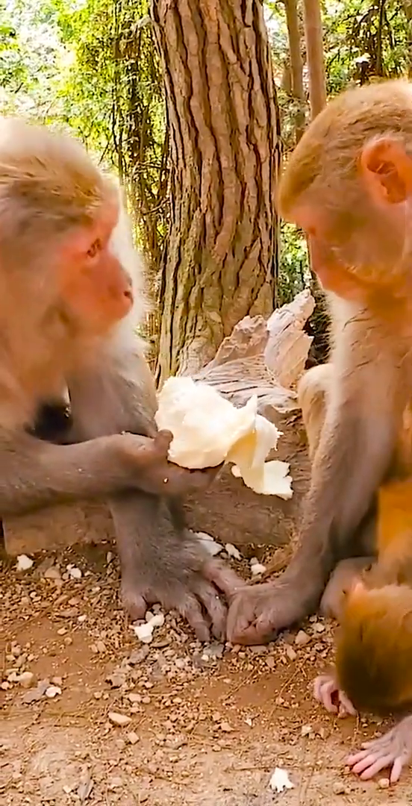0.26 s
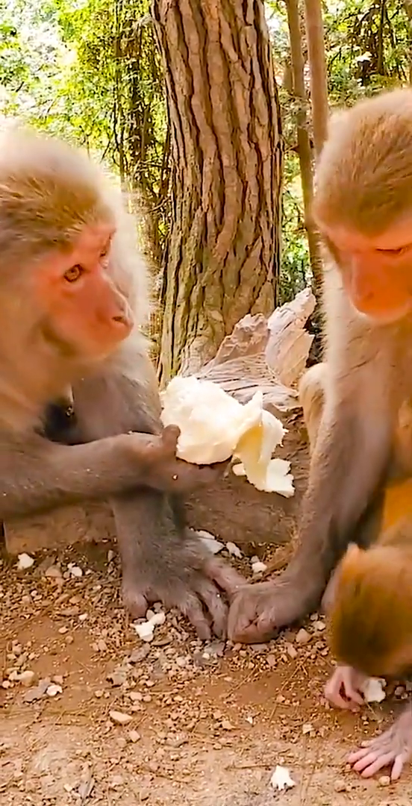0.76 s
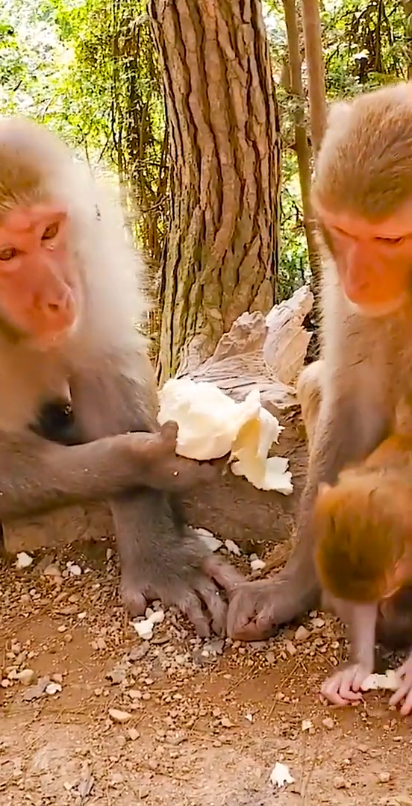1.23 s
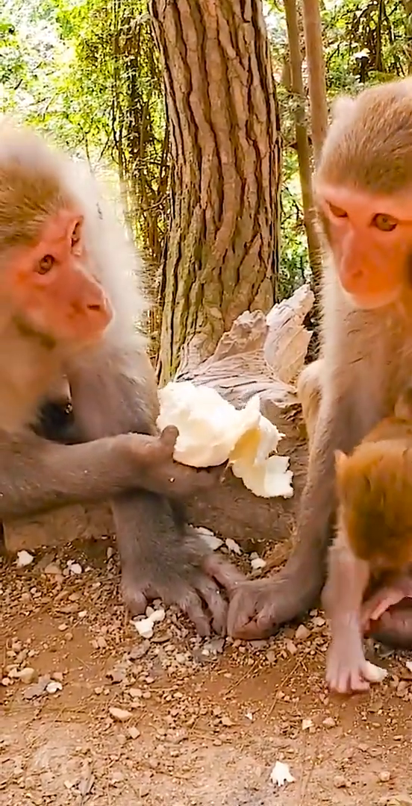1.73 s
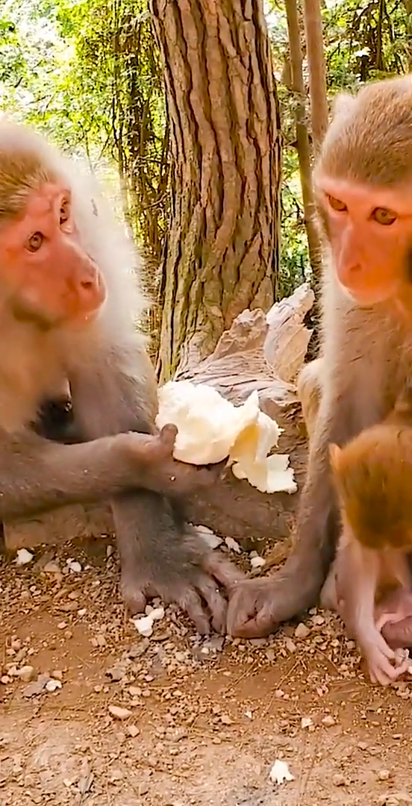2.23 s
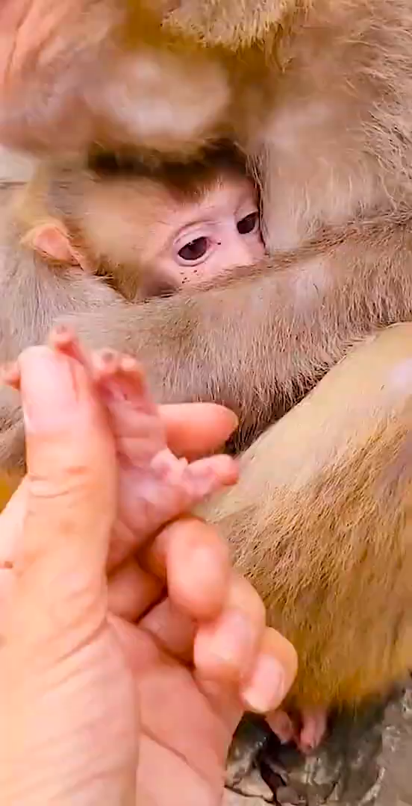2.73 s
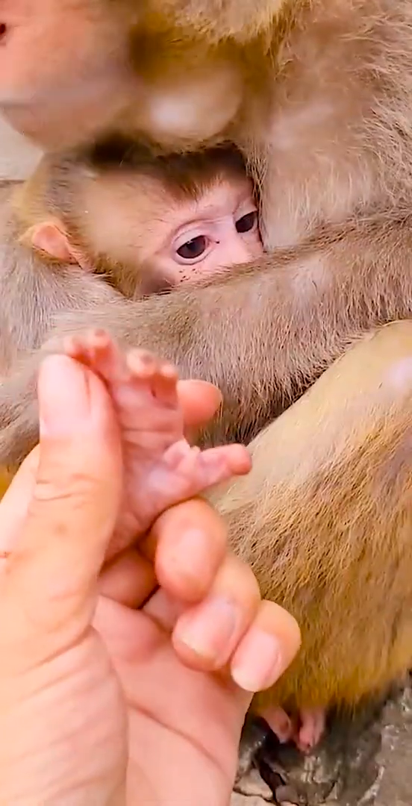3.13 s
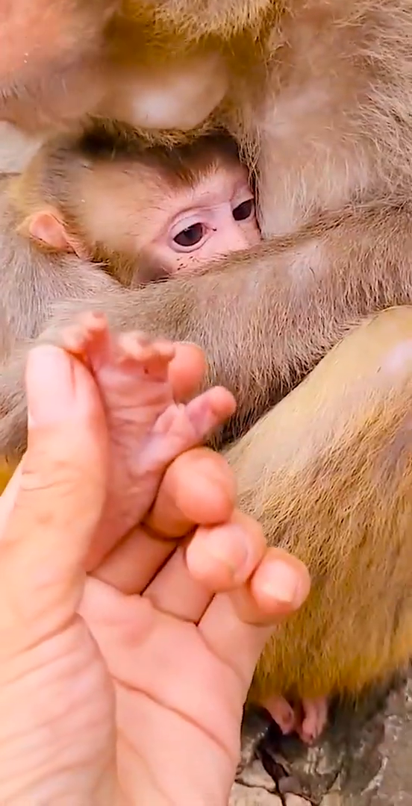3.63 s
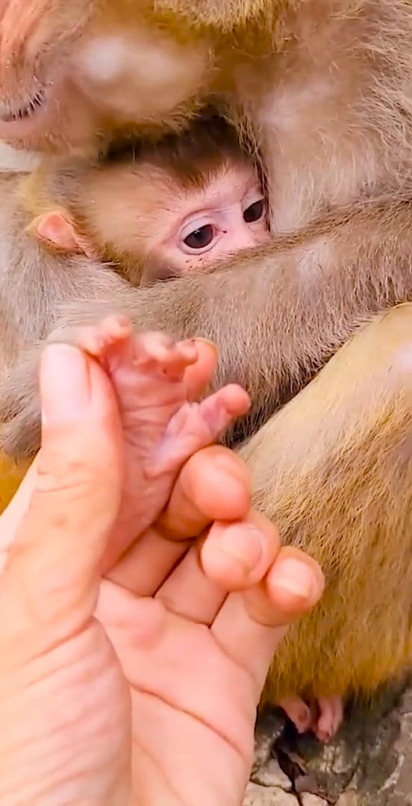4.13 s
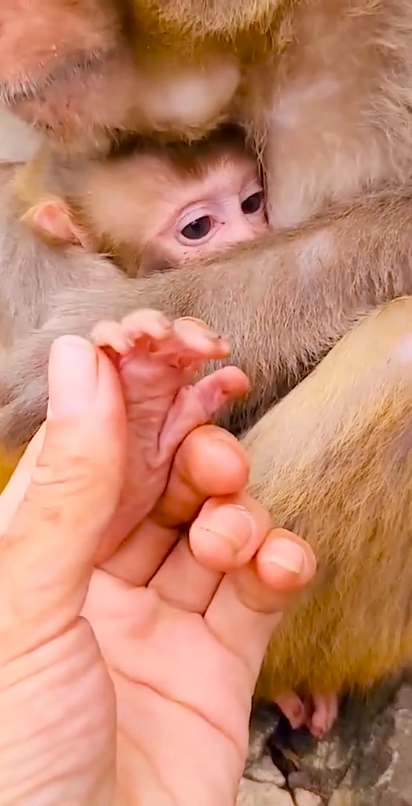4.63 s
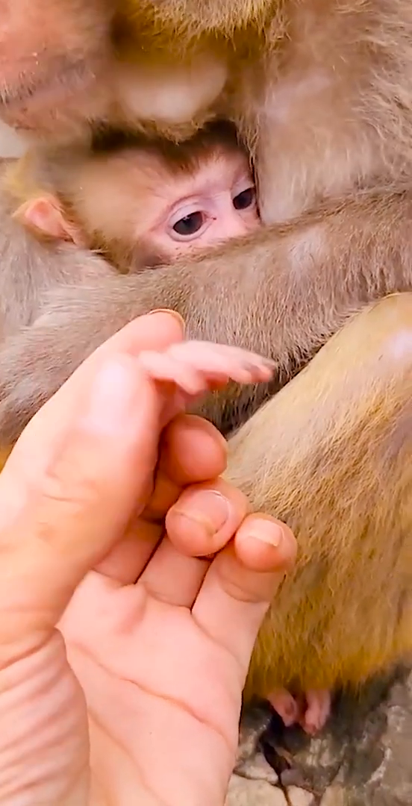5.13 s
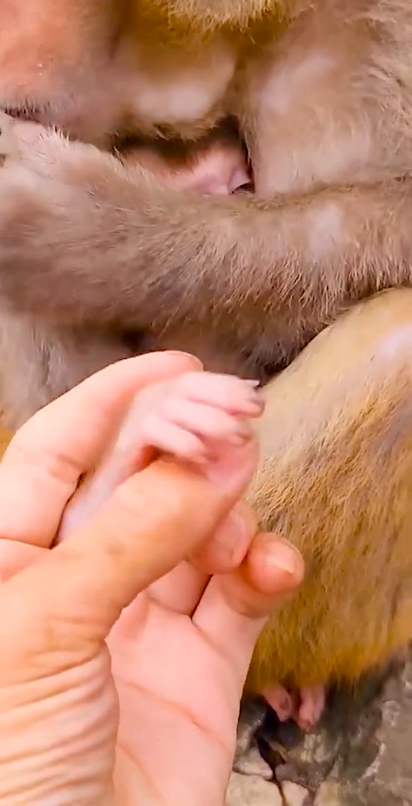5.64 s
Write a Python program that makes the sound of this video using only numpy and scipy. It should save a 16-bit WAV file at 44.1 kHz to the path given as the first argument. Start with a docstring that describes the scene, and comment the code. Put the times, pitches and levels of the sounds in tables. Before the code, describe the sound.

A baby monkey close by grunts, coos in rising squeals and then wheezes thinly, over a low motor hum, airy hiss and distant birdsong.

```python
"""Hissing air and a distant motor's hum run throughout; almost at once a baby monkey grunts close to
the left of a phone. It coos, chirps and wheezes: pitched partials pass mouth and throat, and blurred whistles
mix with hiss. Far birds (sliding sines) and monkeys (stacked partials) call through a wood that scatters them
into a tail. Twigs tick as very short bursts; air is shaped noise and the hum is two wavering motor orders."""
import sys
import numpy as np
from scipy import signal
from scipy.fft import rfft, irfft
from scipy.io import wavfile
from scipy.ndimage import uniform_filter1d

SR = 44100
rng = np.random.default_rng(int(sys.argv[2]) if len(sys.argv) > 2 else 0)


def to_wav(s):
    """Save 16-bit WAV."""
    ch = np.atleast_2d(s).T  # columns
    pcm = np.round(np.clip(ch, -1, 1) * 32767)  # PCM
    wavfile.write(sys.argv[1], SR, pcm.astype(np.int16))


N = 259513  # samples

# Air: relative spectrum (frequency [Hz], density [dB per Hz]), then its overall rms level in dB
AIR_SPECTRUM = [(12, -59), (20, -46), (26, -31), (30, -21), (44, -6), (67, -4), (81, -6), (138, -3),
                (182, -13.5), (318, -19.5), (432, -28), (1480, -27), (2590, -31), (3820, -34),
                (15900, -51.5)]
AIR_DB = -36
# Likeness of the air at the two ports (frequency [Hz], likeness [0-1])
AIR_LIKENESS = [(100, 1), (250, 0.9), (400, 0.7), (700, 0.17), (2000, 0.12), (5000, 0.12), (15000, .1)]
# Balance of the air (frequency [Hz], left over right [dB])
AIR_BALANCE = [(250, -0.5), (400, 0.5), (950, 2.5), (2400, 5), (6000, 5.5), (15000, 3)]
# Swell of the middle hiss before its band weighting (time [s], level [dB])
AIR_SWELL = [(0, 0.5), (3, 0), (3.6, 7), (4.05, -0.5), (4.55, 3.5), (4.9, -2.5), (5.25, 2.5), (5.88, 0.5)]

# Motor's base rate (time [s], frequency [Hz])
HUM_RATE = [(0, 58.6), (2.301, 55.07), (3.6, 54.5), (5.88, 54.86)]
# Motor orders (multiple of the rate, level before wavering [dB])
HUM_ORDERS = [(1, -37), (2, -42)]
# Far sounds reach the left port first; in the hum and air the bass is nearly in phase below BASS_EVEN_HZ
FAR_LEAD_S, BASS_EVEN_HZ = .00057, 110

# Far bird whistles, levels before the trees
# (start [s], length [s], first pitch [Hz], settling pitch [Hz], slide time [s], peak level [dB])
BIRDS = [(1.332, 0.098, 4900, 4650, 0.042, -55), (1.51, .09, 1340, 1300, .04, -46),
         (1.361, 0.2, 3780, 998, 0.084, -41.5), (2.04, .11, 6200, 5700, 0.093, -55),
         (2.19, .08, 5700, 5640, .04, -51), (2.245, 0.16, 3740, 1206, .06, -36.5),
         (2.744, 0.29, 3122, 2040, 0.062, -35), (2.37, .09, 1340, 1290, .04, -50),
         (3.85, .08, 1415, 1689, .025, -48), (4.255, .3, 4500, 2030, .042, -35)]
# Bird heard both directly and among the far calls: columns as in BIRDS; then dB added to its direct sound
NEAR_BIRD = (3.47, .13, 4200, 1500, .055, -45)
NEAR_BIRD_DB = 1
# Swell of a bird whistle: peak as a share of its length, ends in dB against the peak
BIRD_PEAK, BIRD_START_DB, BIRD_END_DB = 0.22, -2.5, -15.5
# Far monkey coos, levels before the trees
# (start [s], length [s], first pitch [Hz], last pitch [Hz], first level [dB], last level [dB])
FAR_COOS = [(1.501, 0.16, 722, 684, -51, -77), (2.078, 0.13, 685, 658, -60.5, -69),
            (5.222, 0.1415, 693.4, 669, -59.5, -53), (5.551, 0.097, 714, 692, -49.5, -73)]
# Partials 1 to 7 of a far coo (relative level [dB])
FAR_COO_PARTIALS = [-2.5, -1.5, -1, 2.5, -4, -5, -3]
FAR_DIRECT_DB = -9  # little of a far call arrives unscattered

# Balance of close sounds (frequency [Hz], left over right [dB])
NEAR_BALANCE = [(600, 11.5), (950, 8.5), (1900, 1.5), (3000, 13.5), (4400, 14.5), (8000, 19), (15000, 21)]
# Phase of close sounds (frequency [Hz], lead of the left [rad])
NEAR_LEAD = [(600, 2.35), (950, 0.56), (1900, 1.33), (3000, 1.46), (6000, 1.8)]
# Twig ticks (time [s], starting level before roughening [dB], pitch [Hz])
TICKS = [(0.1604, -31.5, 5800), (1.2631, -35.5, 8000), (1.3458, -34, 9000), (1.6104, -23, 9240),
         (2.9812, -38, 8670), (4.594, -47, 6450)]
# A duller coo close by (time [s], pitch [Hz], level [dB])
NEAR_COO = [(3.47, 690, -44), (3.56, 648.7, -46), (3.64, 668.5, -44), (3.75, 680, -46), (3.87, 694, -46)]
# Its partials 1 to 5 (relative level [dB])
NEAR_COO_PARTIALS = [-0.5, -14, -16, -22, -26]

# Wheezes through a pinched nose, levels before the passage modes and port balance
# (time [s], whistle pitch [Hz], whistle level [dB], hiss level [dB])
WHEEZES = [
    [(4.07, 2100, -64, -56), (4.124, 1950, -67, -51), (4.13, 1906, -43.5, -52), (4.158, 2620, -30.5, -40),
     (4.186, 2950, -41.5, -40), (4.188, 3100, -65, -44), (4.196, 5300, -60, -43), (4.224, 5823, -36.5, -47),
     (4.245, 6300, -62, -48), (4.29, 7800, -56, -49), (4.32, 7600, -49, -49), (4.35, 9250, -52, -48.5),
     (4.43, 10500, -56, -43), (4.458, 10000, -66, -42), (4.47, 6650, -61, -39), (4.485, 4800, -48, -42),
     (4.496, 3680, -32, -43), (4.51, 3346, -43, -58)],
    [(4.6, 3060, -42, -46), (4.618, 3577, -31.5, -48), (4.63, 5000, -55, -44), (4.642, 6700, -44, -36.5),
     (4.655, 10300, -60, -45), (4.71, 11000, -64, -48)],
    [(4.74, 7700, -65, -47), (4.774, 7910, -72, -42.5), (4.914, 7400, -66, -42.5), (4.99, 7800, -54, -45),
     (5.1, 7300, -62, -47), (5.17, 7140, -59, -47), (5.182, 8300, -60, -49), (5.195, 5000, -56, -50),
     (5.203, 3500, -41, -52), (5.215, 3466, -54, -59)],
    [(5.44, 9200, -63, -39), (5.478, 9780, -57, -49), (5.536, 8720, -56, -59), (5.71, 7850, -53, -56),
     (5.718, 6800, -66, -50), (5.726, 5480, -53, -49), (5.772, 4600, -55, -45.5), (5.792, 3400, -45, -48),
     (5.826, 2100, -50, -52), (5.855, 1934, -62, -41)],
]
# Blur of the first nose mode: the lower, the purer (time [s], rate of random change [Hz])
BLUR = [(4.13, 1400), (4.185, 700), (4.205, 300), (4.33, 350), (4.44, 2500), (4.5, 1500), (4.6, 1000),
        (4.67, 2200), (4.9, 900), (5.16, 900), (5.2, 1300), (5.44, 600), (5.5, 120), (5.71, 120),
        (5.73, 800), (5.84, 1300)]
# Modes of the nose passage (multiple of the whistle pitch, relative level [dB])
NOSE_MODES = [(1, 6), (1.85, -1), (2.9, -10)]
# Relative spectrum of the nose hiss (frequency [Hz], density [dB per Hz])
NOSE_HISS = [(1470, -11.5), (2500, -0.5), (3380, 0), (3620, -1.5), (6410, -4), (7830, -1), (9570, -6),
             (12600, -4), (15800, -12)]

# Vocal folds in the cries (time [s], roughness [0-1], depth of a beat over three cycles [0-1])
FOLDS = [(.24, .05, 0), (.33, .05, 0), (.345, .2, .7), (.38, .15, .7), (.46, .15, .6), (.54, .03, .1),
         (.615, .03, .1), (.625, .5, .8), (.67, .5, .5), (2.98, .07, 0), (3.07, .08, 0), (3.1, .2, 0),
         (3.19, .17, 0), (3.24, .06, 0), (3.45, .03, 0), (3.49, .25, 0), (3.66, .3, 0), (3.7, .06, 0),
         (3.885, .08, 0)]
# Long cries (time [s], pitch [Hz], low partials [dB], mouth opening [0-1], mouth ring [dB],
# bright throat ring [dB], throat ring pitch [Hz])
CRIES = [
    [(.24, 654, -46, 0.1, -45, -49, 8850), (.255, 650, -34.5, .3, -49, -38, 8800),
     (.278, 707, -33.5, 0.41, -41, -37, 9150), (.342, 657, -34.5, 0.42, -52, -48, 8860),
     (.348, 677, -29, .6, -48, -45, 7600), (.395, 719, -30, 0.28, -46.5, -38, 7600),
     (.475, 799, -25.5, 0.51, -46, -34, 7450), (.492, 835, -22, .7, -40, -31, 7600),
     (.512, 853, -18, 0.81, -37.5, -27, 7600), (.548, 965.5, -21, 0.51, -29.5, -36, 7870),
     (.573, 960, -22, .55, -30, -38, 7760), (.587, 925, -22, .55, -30, -34, 7700),
     (.6, 940, -21, .55, -29, -32, 7650), (.616, 928, -20, 0.52, -30, -32, 7500),
     (.628, 809, -27, 0.54, -30.5, -30.5, 8650), (.652, 752, -27, 0.45, -31, -35, 8800),
     (.67, 626, -35.5, 0.47, -52, -64, 8920)],
    [(2.985, 631, -55, .1, -56, -55, 8790), (3.009, 666, -37.5, 0.12, -47.5, -42, 8730),
     (3.045, 696, -35, .07, -48, -39.5, 8800), (3.085, 619, -37.5, 0.34, -57, -58, 8780),
     (3.14, 611, -33.5, 0.39, -51.5, -54.5, 9550), (3.196, 756, -28.5, 0.17, -55, -42, 10270),
     (3.274, 872, -26.5, 0.13, -49.5, -39.5, 10550), (3.3, 838, -23.5, 0.29, -59, -44, 10000),
     (3.312, 876, -25, 0.1, -49, -34, 10000), (3.352, 945, -21.5, 0.22, -46.5, -44, 10100),
     (3.444, 954, -20.5, 0.26, -41.5, -44, 9280), (3.466, 843, -24, 0.25, -49, -35.5, 9150),
     (3.49, 621, -28.5, 0.36, -37, -66, 9240)],
    [(3.66, 522, -34.5, 0.38, -48, -51, 8800), (3.676, 583.6, -32.5, 0.59, -41.5, -44, 8250),
     (3.7, 642, -31.5, 0.24, -40, -37.5, 7800), (3.75, 613, -38, .2, -57, -50, 8300),
     (3.77, 629, -35.5, 0.17, -48, -40.5, 8240), (3.848, 685, -30.5, 0.26, -41, -46, 8400),
     (3.87, 639.6, -31.5, 0.45, -41, -50, 8560), (3.885, 626.6, -48, .2, -68, -67, 8630)],
]
# Short bright calls, levels at their peak (start [s], length [s], first pitch [Hz], last pitch [Hz],
# low partials [dB], mouth opening [0-1], mouth ring [dB], throat ring [dB])
CHIRPS = [(0.219, 0.019, 715, 697, -36, 0, -53, -54), (4.713, 0.023, 900, 800, -29.5, 0, -29.5, -30),
          (5.379, .028, 860, 770, -28, .02, -29, -43)]
# Short rough calls, columns as in CHIRPS
GRUNTS = [(.05, 0.057, 609.6, 749, -41.5, 0.56, -38, -47.5), (3.9, 0.097, 591, 602, -34.5, 0.21, -56, -60),
          (5.34, 0.021, 654, 643, -37, 0.42, -38.5, -48), (5.41, .03, 703, 630, -36.5, 0.55, -38.5, -45),
          (5.855, 0.032, 977, 1000, -38.5, 0.26, -42.5, -45)]
CHIRP_ROUGH, GRUNT_ROUGH = .14, .68  # fold roughness, 0-1
# Swell of a short call: peak as a share of its length, ends in dB against the peak
SHORT_PEAK, SHORT_START_DB, SHORT_END_DB, SHORT_THROAT_HZ = 0.38, -9, -10, 8800
# Mouth resonances (frequency [Hz], width [Hz], relative level [dB])
MOUTH = [(3100, 1380, 5.5), (4880, 970, 3.5), (5800, 1000, -5.5)]
# Throat resonances when the throat ring sits at 9000 Hz (frequency [Hz], width [Hz], relative level [dB])
THROAT = [(9050, 1400, 13.5), (6700, 1000, -8), (11540, 3000, 4)]
# The lowest mouth resonance rises as the mouth opens, with a fall-off on both sides
SHUT_HZ, OPEN_HZ, JAW_DB_PER_KHZ2 = 900, 2696, -15
CHEST_DB = -17  # the fundamental never falls far below the mouth resonance
# A shut mouth favours odd partials: opening where this ends, third in dB against the mouth ring,
# share of the second lost
SHUT_OPENING, SHUT_THIRD_DB, SHUT_SECOND = .04, -2, .8

EDGE_HZ = 15850  # the recorder's band limit


def amp(db):
    """Amplitude factor of a level in dB."""
    return 10 ** (np.asarray(db) / 20)


def evened(x):
    """Scale to an rms of 1."""
    return x / np.sqrt(np.mean(abs(x) ** 2) + 1e-20)


def read(points, hz):
    """Read a curve at the given frequencies, interpolating over log frequency."""
    f, value = np.transpose(points)
    return np.interp(np.log(hz + 1), np.log(f + 1), value)


def wobble(hz, count):
    """Complex noise smoothed to a bandwidth that may change along the sound; rms 1."""
    steps = np.cumsum(hz * np.ones(count)) / SR
    knots = rng.standard_normal((int(steps[-1]) + 3, 2)) @ [1, 1j]
    knot = steps.astype(int)
    turn = np.pi / 2 * (steps % 1)
    return (knots[knot] * np.cos(turn) + knots[knot + 1] * np.sin(turn)) / np.sqrt(2)


def played(tables, fade_s):
    """Sample places, a soft gate and the smoothed columns of all the stretches."""
    t, width = np.arange(N) / SR, round(fade_s * SR)
    gate = sum((t >= rows[0][0]) & (t < rows[-1][0]) for rows in tables) * 1.
    gate = uniform_filter1d(gate, width)
    at = np.flatnonzero(gate > 1e-6)
    s, *columns = np.vstack(tables).T
    return at, gate[at], [uniform_filter1d(np.interp(t[at], s, c), width) for c in columns]


def lag(hz):
    """Phase by which the right port trails for the hum and air."""
    return np.exp(-2j * np.pi * hz * FAR_LEAD_S * hz / np.hypot(hz, BASS_EVEN_HZ))


def air():
    """Rumble and hiss as random short-time spectra with faint drifting patches."""
    frames, hz = N // 512 + 5, np.fft.rfftfreq(2048, 1 / SR)
    a, b, c, d, patches = rng.standard_normal((frames, 1025, 5)).T
    patches = evened(uniform_filter1d(uniform_filter1d(patches, 8, 1), 30, 0))
    same = np.clip(read(AIR_LIKENESS, hz), 0, 1)[:, None]
    left = a + 1j * b
    right = same * left * lag(hz)[:, None] + np.sqrt(1 - same ** 2) * (c + 1j * d)
    # the swell acts mainly from 700 to 6500 Hz
    middle = hz ** 2 / (hz ** 2 + 700 ** 2) / (1 + (hz / 6500) ** 4)
    swell_db = np.outer(middle, np.interp(np.arange(frames) * 512 / SR, *np.transpose(AIR_SWELL)))
    tilt = amp(read(AIR_BALANCE, hz) / 2)[:, None]
    level_db = read(AIR_SPECTRUM, hz)[:, None] + 1.09 * patches + swell_db
    spectra = np.array([left * tilt, right / tilt]) * amp(level_db)
    noise = signal.istft(spectra, nperseg=2048, noverlap=1536)[1][:, :N]
    return amp(AIR_DB) * evened(noise)


def hum():
    """The motor's two lowest orders, each wavering in strength and phase."""
    s, hz = np.transpose(HUM_RATE)
    turn = 2 * np.pi * np.cumsum(np.interp(np.arange(N) / SR, s, hz)) / SR
    left = np.zeros(N)
    for k, db in HUM_ORDERS:
        waver = 1 + 0.25 * k * wobble(9, N)
        left += amp(db) * np.sqrt(2) * (waver * np.exp(1j * k * turn)).real
    right = irfft(rfft(left) * lag(np.fft.rfftfreq(N, 1 / SR)), N)
    return np.array([left, right])


def trees(x, t60, direct_db):
    """Many trunks scatter a call into a dense dying tail, partly shared by the two ports."""
    t = np.arange(SR) / SR
    a, b = rng.standard_normal((2, SR)) * amp(-60 * t / t60) * (1 - np.exp(-t / 0.0018))
    tail = np.array([a, 0.13 * a + 1.37 * b]) / np.linalg.norm(a)
    tail[:, 0] += amp(direct_db)
    left, right = signal.fftconvolve(x[None], tail, axes=1)[:, :N]
    return np.array([left, amp(-9.0) * np.roll(right, round(FAR_LEAD_S * SR))])


def whistle(start, length, first_hz, settle_hz, slide_s, peak_db):
    """A bird's quick slide that settles, as rows (time [s], pitch [Hz], level [dB])."""
    u = np.linspace(0, 1, 24)
    hz = settle_hz + (first_hz - settle_hz) * np.exp(-u * length / slide_s)
    swell_db = np.interp(u, [0, BIRD_PEAK, 1], [BIRD_START_DB, 0, BIRD_END_DB])
    return np.transpose([start + u * length, hz, peak_db + swell_db])


def sung(rows, partials):
    """A stack of partials, wavering in pitch and level, along rows (time [s], pitch [Hz], level [dB])."""
    out = np.zeros(N)
    at, gate, (hz, db) = played([rows], fade_s=0.014)
    turn = 2 * np.pi * np.cumsum(hz * (1 + .013 * wobble(120, len(at)).real)) / SR
    level = amp(db + 2.5 * wobble(50, len(at)).real)
    stack = sum(amp(p) * np.sin(k * turn) for k, p in enumerate(partials, 1))
    out[at] = gate * level * stack * np.sqrt(2)
    return out


def far_calls():
    """Sliding sines for the birds, short stacks of partials for the monkeys."""
    birds = sum(sung(whistle(*row), [0]) for row in BIRDS + [NEAR_BIRD])
    coos = [[(s, f0, db0), (s + d, f1, db1)] for s, d, f0, f1, db0, db1 in FAR_COOS]
    return birds + sum(sung(rows, FAR_COO_PARTIALS) for rows in coos)


def near(x):
    """The phone's body shades the right port from a source on the left."""
    f = np.fft.rfftfreq(N, 1 / SR)
    right = amp(-read(NEAR_BALANCE, f)) * np.exp(-1j * read(NEAR_LEAD, f))
    left = rfft(x) * 2 / abs(1 + right)  # keeps the level of the two ports' mean
    return irfft([left, left * right], N)


def ticks():
    """Each twig gives a very short burst around its own pitch."""
    out, t = np.zeros(N + 400), np.arange(400) / SR
    for (s, db, hz), noise in zip(TICKS, rng.standard_normal((len(TICKS), 400))):
        ring = amp(db - 60 * t / 0.0081) * np.sin(2 * np.pi * hz * t)  # falls 60 dB in 8.1 ms
        out[round(s * SR):][:400] += ring * (.5 + uniform_filter1d(noise, size=7))
    return out[:N]


def near_calls():
    """A dull coo as a stack of partials, and a bird's sliding sine."""
    return sung(NEAR_COO, NEAR_COO_PARTIALS) + sung(whistle(*NEAR_BIRD), [NEAR_BIRD_DB])


def wheezes():
    """Blurred whistles that slide with the nose opening, and a bright patchy hiss that differs at each port."""
    at, gate, (hz, whistle_db, hiss_db) = played(WHEEZES, fade_s=.007)
    turn = 2 * np.pi * np.cumsum(hz) / SR
    blur_hz = np.interp(at / SR, *np.transpose(BLUR))
    tone = 0
    for k, db in NOSE_MODES:
        damping = 1 + (hz / 3050) ** 14 * (k > 1)  # upper modes vanish under a high whistle
        tone = tone + amp(db) / damping * wobble(k * blur_hz, len(at)) * np.exp(1j * k * turn)
    f, _, z = signal.stft(rng.standard_normal((2, len(at))), SR, nperseg=256)
    patches = rng.standard_normal(z.shape[1:])
    patches = evened(uniform_filter1d(uniform_filter1d(patches, 9, 0), 10, 1))
    shaped = z * amp(read(NOSE_HISS, f)[:, None] + 3.4 * patches)
    hiss = evened(signal.istft(shaped, nperseg=256)[1][:, :len(at)])
    tones, breath = np.zeros(N), np.zeros((2, N))
    tones[at] = gate * amp(whistle_db + 4 * wobble(80, len(at)).real) * np.sqrt(2) * tone.real
    breath[:, at] = gate * amp(hiss_db) * hiss * amp([[4.0], [-3.0]])  # left, right
    return near(tones) + breath


def short_call(start, length, first_hz, last_hz, low_db, opening, mouth_db, throat_db):
    """Rows like those of a cry: one swell of effort on a straight glide."""
    rows = []
    for u, db in [(0, SHORT_START_DB), (SHORT_PEAK, 0), (1, SHORT_END_DB)]:
        hz = first_hz + u * (last_hz - first_hz)
        rows.append((start + u * length, hz, low_db + db, opening, mouth_db + db, throat_db + db,
                     SHORT_THROAT_HZ))
    return rows


def rings(modes, hz):
    """Gain of a few steep resonances over a faint floor."""
    return sum(amp(db) / (1 + ((hz - f) / (w / 2)) ** 2) ** 1.23 for f, w, db in modes) + amp(-47.0)


def folds(at):
    """How rough the vocal folds swing, and how deep the beat over three cycles is."""
    shorts = [(row[0] + u * row[1], rough, 0)
              for rows, rough in [(CHIRPS, CHIRP_ROUGH), (GRUNTS, GRUNT_ROUGH)]
              for row in rows for u in (0, 1)]
    s, rough, third = np.transpose(sorted(FOLDS + shorts))
    return [np.clip(np.interp(at / SR, s, c), 0, 1) for c in (rough, third)]


def vocal_tract(hz, low_db, opening, mouth_db, throat_db, throat_hz):
    """Gains of partials 1 to 21: the jaw shapes the lowest three, mouth and throat rings the rest."""
    low, k = np.arange(1, 4)[:, None], np.arange(4, 22)[:, None]
    jaw_hz = SHUT_HZ + opening * (OPEN_HZ - SHUT_HZ)
    jaw = amp(JAW_DB_PER_KHZ2 * ((low * hz - jaw_hz) / 1000) ** 2) + amp(-32) + (low == 1) * amp(CHEST_DB)
    shut = np.clip(2 - 2 * opening / SHUT_OPENING, 0, 1)
    jaw = jaw * (1 - (low == 2) * SHUT_SECOND * shut)
    third_ring = (low == 3) * shut * amp(mouth_db + SHUT_THIRD_DB)
    lower = amp(low_db) * jaw / np.linalg.norm(jaw, axis=0) + third_ring
    mouth = rings(MOUTH, k * hz)
    throat = rings(THROAT, k * hz * 9000 / throat_hz) / (1 + (k * hz / 13200) ** 12)
    upper = amp(mouth_db) * mouth / np.linalg.norm(mouth, axis=0)
    upper = upper + amp(throat_db) * throat / np.linalg.norm(throat, axis=0)
    return [*lower, *upper]


def baby():
    """Partials on one pitch; rough folds blur each partial, and all pass mouth and throat."""
    calls = sorted(CRIES + [short_call(*row) for row in CHIRPS + GRUNTS])
    at, gate, (hz, *tract) = played(calls, fade_s=.005)
    rough, third = folds(at)
    turn = 2 * np.pi * np.cumsum(hz * (1 + 0.00626 * wobble(89.9, len(at)).real)) / SR
    out = np.zeros(N)
    for order, gain in enumerate(vocal_tract(hz, *tract), 1):
        blur = rough ** (6 / (order + 1))  # high partials smear first
        patchy = amp(min(.9 * (order - 1), 4) * wobble(35, len(at)).real)  # and come and go
        beat = 1 + third * min(order / 5, 1) * (np.cos(turn / 3) + .5 * np.cos(2 * turn / 3 + order))
        swing = np.sqrt(1 - blur) + np.sqrt(blur) * wobble(1.5 * hz, len(at))
        partial = (swing * np.exp(1j * (order * turn + 0.4 * order ** 2))).real
        out[at] += np.sqrt(2) * gain * patchy * beat * partial
    out[at] *= gate
    return out


def scene():
    """Air, hum and far calls behind the close sounds, which the trees also scatter faintly."""
    close = baby() + ticks() + near_calls()
    far = amp(7.0) * trees(far_calls(), t60=0.9, direct_db=FAR_DIRECT_DB)
    scattered = amp(-16.5) * trees(close, t60=0.19, direct_db=-40)
    return air() + hum() + far + scattered + near(close) + wheezes()


def record(dry):
    """The small microphones lose the deepest bass; then the recorder's band limit."""
    thin = signal.sosfilt(signal.butter(4, 32, "highpass", fs=SR, output="sos"), dry)
    band_limit = signal.firwin(511, EDGE_HZ, window=("kaiser", 9), fs=SR)
    return signal.oaconvolve(thin, band_limit[None], "same")


dry = scene()
out = record(dry)
to_wav(out)
```